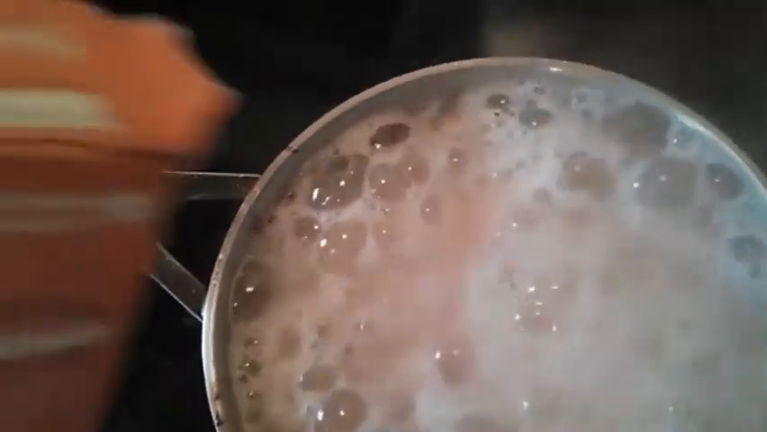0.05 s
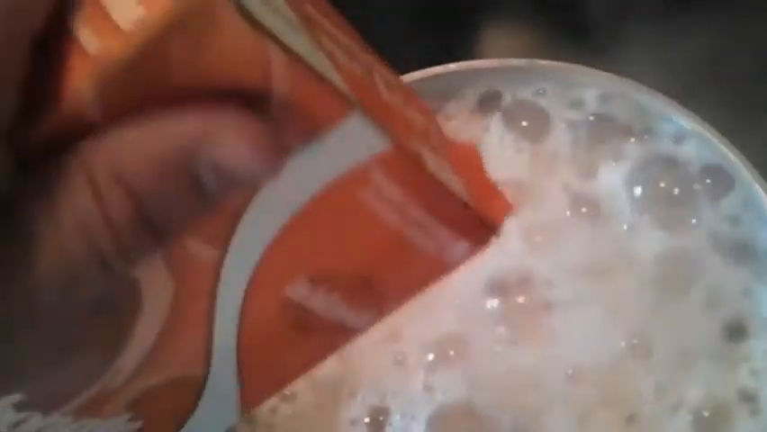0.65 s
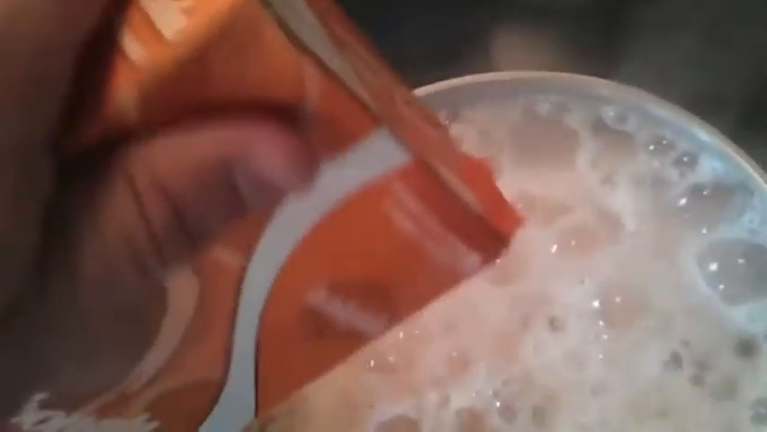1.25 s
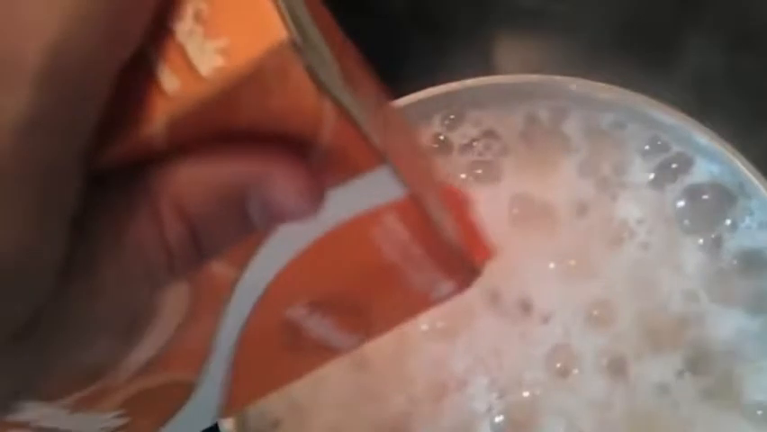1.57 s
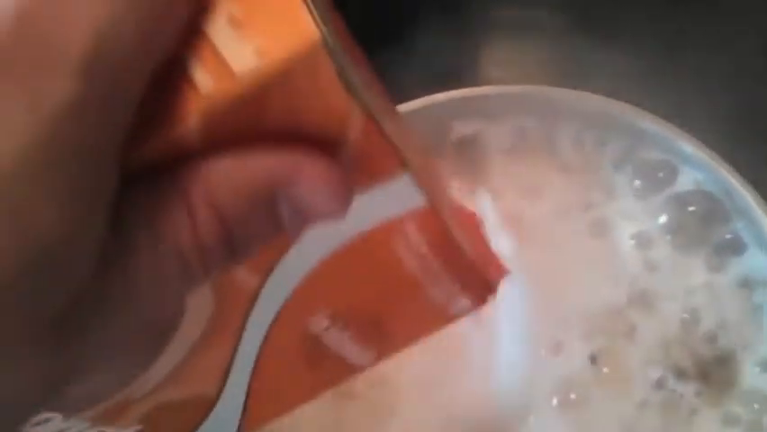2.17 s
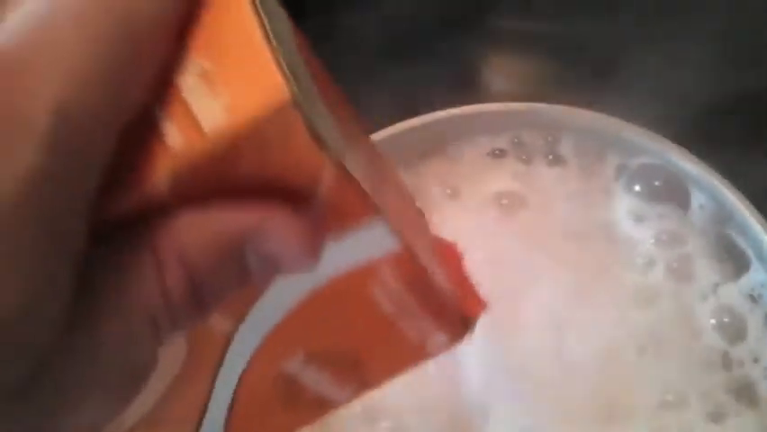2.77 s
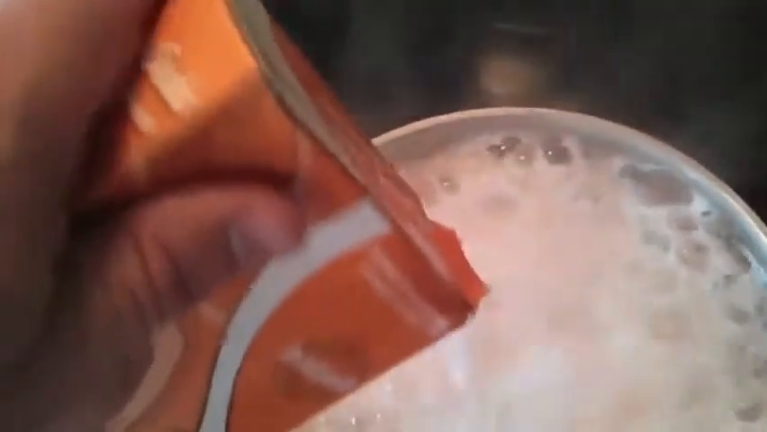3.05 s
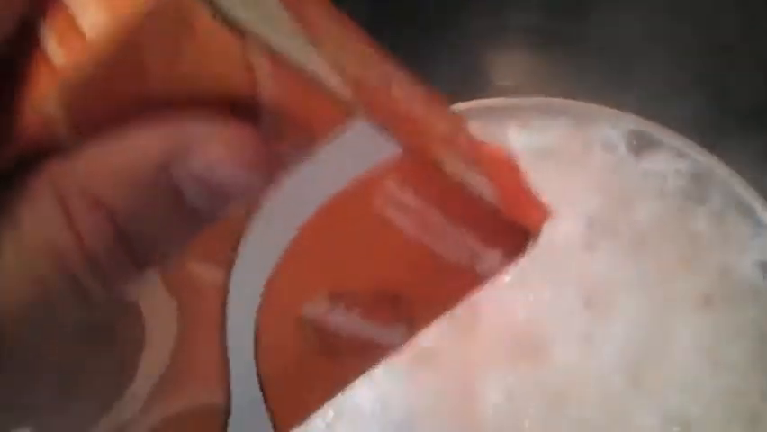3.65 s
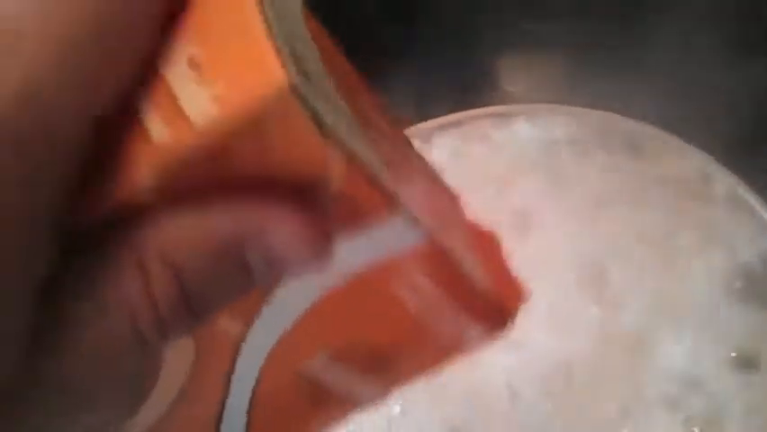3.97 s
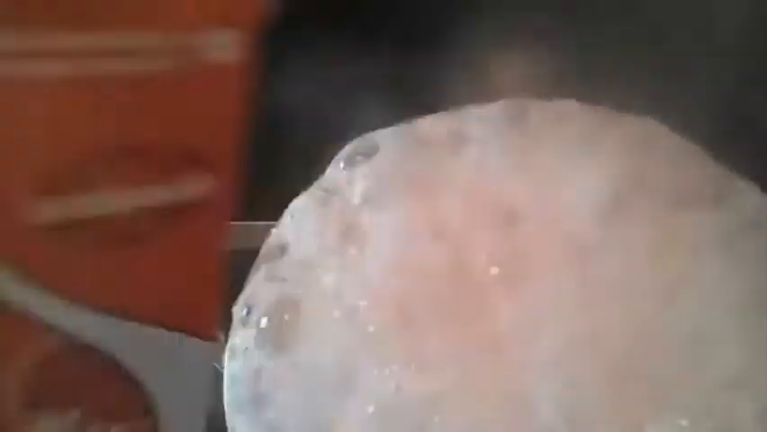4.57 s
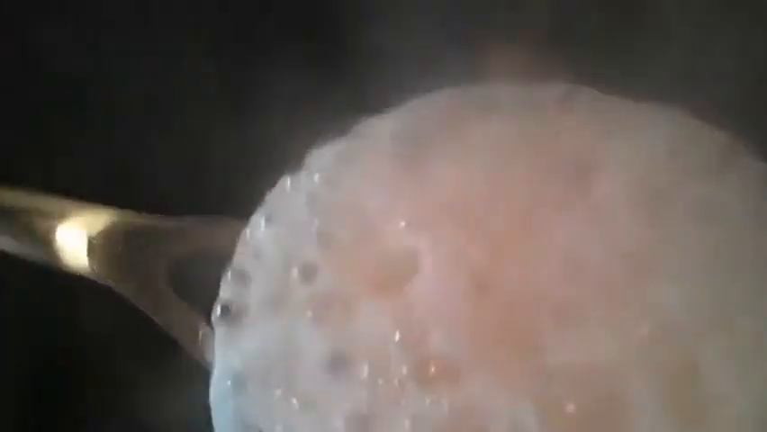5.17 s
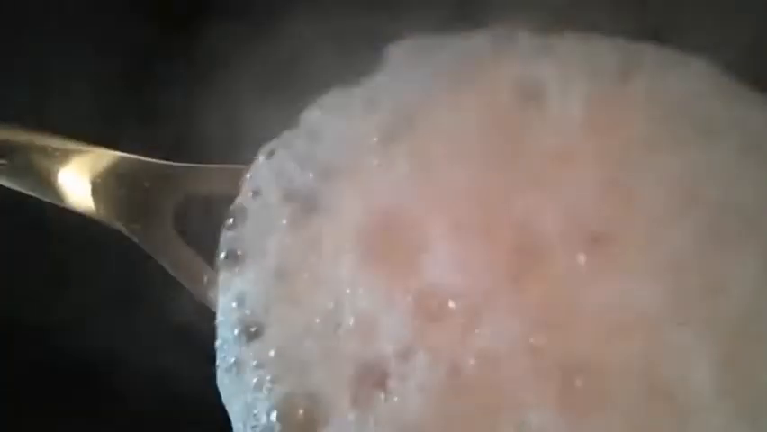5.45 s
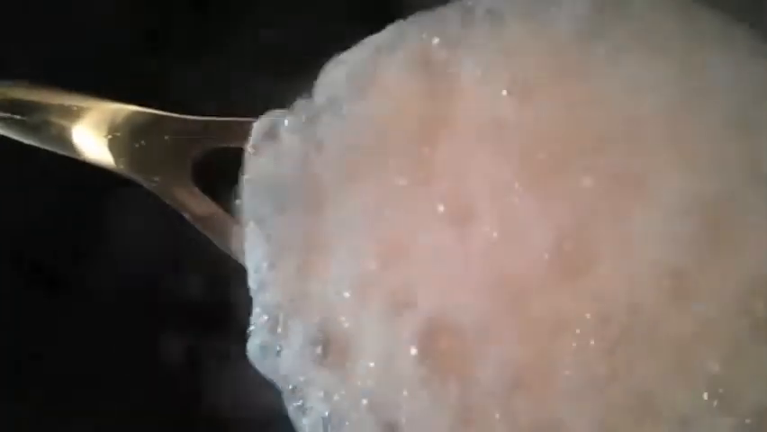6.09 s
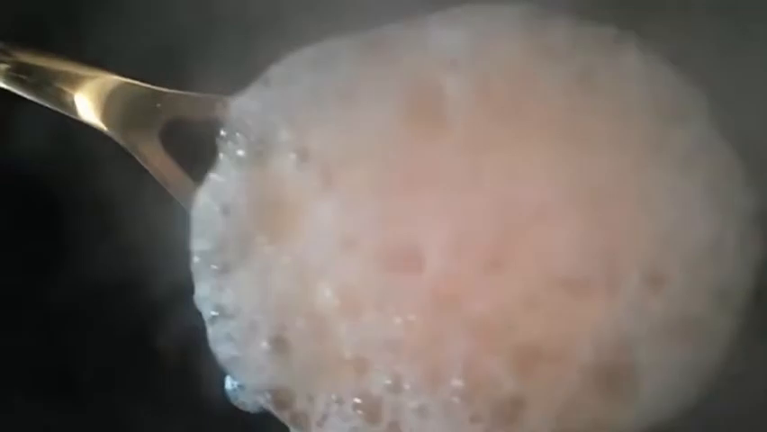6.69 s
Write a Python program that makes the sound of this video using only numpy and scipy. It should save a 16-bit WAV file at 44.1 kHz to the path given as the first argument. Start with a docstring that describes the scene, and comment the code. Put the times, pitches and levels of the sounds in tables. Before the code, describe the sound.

Boiling vinegar in a metal pot fizzes as baking soda pours in, then foams over, hissing and sputtering on the hot burner.

```python
"""Baking soda in boiling vinegar

Vinegar boils in a metal pot on a humming stove, and its bursting bubbles make the pot ring.
Baking soda falls from a box, first in pinches, then in a steady pour. Foam smothers the boil
with a fine fizz of tiny gas bubbles, and the box is set down with a light knock.
Then the foam spills over the rim and hisses and sputters on the hot burner."""
import sys
import numpy as np
from scipy import signal
from scipy.fft import rfft, irfft
from scipy.io import wavfile

SR = 44100
rng = np.random.default_rng(int(sys.argv[2]) if len(sys.argv) > 2 else 0)


def inscribe(sig):
    """Save sig as 16-bit PCM at rate SR to the path in sys.argv[1].

    A 1-D sig is mono; a 2-D sig holds one channel per row.
    Samples are clipped to [-1, 1] before scaling.
    """
    pcm = np.round(np.clip(np.atleast_2d(sig).T, -1, 1) * 32767)
    wavfile.write(sys.argv[1], SR, pcm.astype(np.int16))


N = 305172
TIME = np.arange(N) / SR
BINS = np.fft.rfftfreq(4096, 1 / SR)  # the pitches in Hz at which a tone is shaped

# The stove's drone. Each row: time in seconds, base level in dB.
DRONE_LEVEL = [(0.15, -59.5), (.33, -54.5), (1.25, -57), (2.4, -60), (3.1, -56), (4.0, -57), (5.0, -56),
               (5.35, -64.5), (5.75, -66), (6.8, -61)]
# Knocks and thumps. Each row: start in seconds, relative peak in dB, pitch in Hz, decay in seconds.
KNOCKS = [(0.64, -48, 70, 0.055), (5.075, -30.5, 900, 0.0065), (5.082, -42, 237, .022),
          (5.088, -38.5, 900, 0.014), (5.137, -38, 840, 0.0049), (5.26, -38, 750, 0.015),
          (5.87, -53, 75, 0.11), (6.47, -40, 222, 0.06), (6.551, -42, 300, 0.039)]
# The boil builds, is smothered and stirs again. Each row: time in seconds, level in dB.
BOIL_LEVEL = [(0, -49.5), (1.2, -48), (1.6, -46.5), (2.15, -46), (2.42, -49), (2.58, -47.5), (2.75, -51),
              (3.45, -54.5), (4.55, -58), (5.1, -51), (5.45, -56)]
# The largest bubbles. Each row: start in seconds, relative peak in dB, pitch in Hz.
POPS = [(0.75, -30.5, 1170), (0.901, -32, 654), (0.949, -35, 1590), (1.172, -36, 789), (1.413, -33, 649),
        (1.455, -30.5, 797), (1.625, -33, 630), (1.656, -33, 611), (2.014, -31.5, 816), (2.044, -29, 781),
        (2.144, -28, 643), (2.571, -33, 1200)]
# Fizz from pinches of powder. Each row: start in seconds, peak in dB, rise in seconds.
PINCHES = [(-0.22, -44, 0.58), (0.49, -50, 0.054), (0.82, -50.2, .04), (1.23, -53, .02), (1.42, -59, .05),
           (1.71, -54.8, .03), (1.88, -49, 0.1)]
# Foam reaches the burner, a trickle and then a flood. Each row: time in seconds, dB against full flow.
FLOW = [(5.33, -16.5), (5.42, -8), (5.52, -8.5), (5.6, -6.5), (5.8, -3.5), (6.2, -1.76), (6.5, 0.8),
        (6.7, -.5), (6.9, -0.5)]

# The tone of each sound. Each row: pitch in Hz, relative level in dB.
DRONE_TONE = [(20, -36), (50, -12), (75, -9), (100, -1), (122, -2), (150, -3.5), (190, -9), (310, -11),
              (430, -17), (600, -20), (1200, -24.5)]
BOIL_TONE = [(100, -12.5), (330, -3.5), (430, -13.5), (600, -9), (900, -1.5), (1300, -7.5), (1750, -4),
             (2100, -12.5), (2600, -21.5), (3200, -38), (5000, -19), (9000, -32)]
FRESH_FOAM_TONE = [(2000, -54), (3300, -25), (4500, -12), (5200, -14), (6300, -7.5), (7000, 1.5),
                   (9000, 1.5), (11000, 2.5), (12500, -1)]
OLDER_FOAM_TONE = [(2000, -52), (3200, -27), (4300, -13.5), (5200, -10.5), (6400, -4.5), (7600, -0.5),
                   (8700, -3), (10000, -4), (11000, -9.5), (13000, -7.5)]
LARGE_CELL_TONE = [(700, -18.5), (1200, -8.5), (1600, -5.5), (1980, 0), (2300, -5), (2650, -8),
                   (3000, -15.5), (4000, -34.5)]
STEAM_TONE = [(1800, -26), (3000, -10), (4200, -10), (5000, -2.5), (6000, 2), (8000, -.5), (10000, -0.5),
              (12000, -4), (13500, -5.5)]
SPUTTER_TONE = [(100, -38), (330, -22), (420, -26.5), (650, -18.5), (900, -7), (1350, -5.5), (1700, 0.5),
                (1980, 2), (2350, -3.5), (2700, -6.5), (3300, -12), (4700, -11), (7000, -37.5)]

# How the pot and the gap under it ring. Each row: pitch in Hz, width in Hz, boost or cut in dB.
POT_RESONANCES = [(503.4, 33, 9.5), (621.6, 112, 12), (705, 45, -6), (800, 47, 7), (1100, 60, 3),
                  (1234, 95, 8), (1635, 31, 7)]
GAP_RESONANCES = [(507, 25, 6.5), (642, 26, 4.5), (786, 47, 6), (817, 39, -8.5), (862, 37, 3.5),
                  (1100, 61, 3), (1240, 22, 2.5), (1300, 40, 1.5), (1716, 29, 3), (1880, 30, -3.5),
                  (1930, 32, 2.5), (2085, 18, 1), (2318, 33, 5)]
# The echo between pot and stove top. Each row: pitch in Hz, strength from 0 to 1.
GAP_ECHO = [(500, 0), (1900, 0), (2500, 0.56), (3500, 1), (4200, 0.57), (5200, 0.23), (7000, 0)]

PINCH_FADE_S, PINCH_FRESH_SHARE = 0.19, 0.22
IDLE_FIZZ_DB, SEETHE_DB = -57.5, -17  # old foam between pinches; large cells relative to the fizz
POUR_S, POUR_RISE_S, POUR_DB = 2.01, 0.26, -35.5
FRESH_HOLD_S, COARSEN_S = 0.92, 1.05  # new foam stays very fine for a while, then coarsens
CONTACT_S, CONTACT_RISE_S = 5.3, 0.056  # the foam first touches the burner
HISS_DB, SPUTTER_DB, GURGLE_DB = -23.5, -27.5, -23  # at full flow
SPUTTER_SLOPE, GURGLE_SLOPE = 2.33, 1.71  # dB gained for each dB of flow
SPUTTER_FULL_DB = -5  # the sputter stops growing at this flow
GURGLE_TOP_HZ, TREBLE_LIMIT_HZ = 1670, 14120


def amp(db):
    """Turns decibels into a gain to multiply by."""
    return 10 ** (np.asarray(db) / 20)


def evened(x):
    """Scales a signal to an average (rms) level of 1."""
    return x / np.sqrt(np.mean(x ** 2) + 1e-20)


def since(start):
    """Seconds passed since the start, zero before it."""
    return np.maximum(TIME - start, 0)


def over_time(rows):
    """Joins a table's points into a value for every sample."""
    seconds, value = np.transpose(rows)
    return np.interp(TIME, seconds, value)


def over_pitch(rows):
    """Joins a table's points into a value for every pitch in BINS."""
    hz, value = np.transpose(rows)
    return np.interp(np.log(BINS + 1), np.log(hz), value)


def add(mix, start, sound):
    """Mixes a sound in at a start time in seconds."""
    part = mix[max(round(start * SR), 0):][:len(sound)]
    part += sound[:len(part)]


def resonances(rows):
    """The dB that a hollow space adds to any sound inside it."""
    return sum(db / (1 + (2 * (BINS - hz) / width) ** 2) for hz, width, db in rows)


def bump(hz, octaves):
    """The tone in dB of one broad resonance with steep sides."""
    return -40 * np.log10(1 + (np.log2((BINS + 1) / hz) / octaves) ** 2)


def ring(tone_db):
    """What one click sounds like in this tone (its impulse response)."""
    log_gain = np.log(amp(np.maximum(tone_db, -90)))
    mirrored = np.concatenate([log_gain, log_gain[-2:0:-1]])
    spectrum = np.exp(np.conj(signal.hilbert(mirrored)))  # puts all the ringing after the click
    return np.fft.ifft(spectrum).real


def coloured(x, tone_db):
    """Gives a signal a tone, at an average level of 1."""
    return evened(signal.oaconvolve(x, ring(tone_db))[:N])


def flutter(per_s, depth_db):
    """A gain that wanders at random, up to about per_s times a second."""
    hz = np.fft.rfftfreq(N, 1 / SR)
    slow = rfft(rng.standard_normal(N)) / (1 + (hz / per_s) ** 2)
    return amp(depth_db * evened(irfft(slow, N)))


def patchy(x, width_hz, life_s, depth_db):
    """Bubbles of like size come in swarms, so narrow bands of pitch swell and fade."""
    bands = signal.stft(x, nperseg=1024, noverlap=768)[2]
    across_pitch = np.fft.fftfreq(bands.shape[0], SR / 1024)[:, None]
    along_time = np.fft.fftfreq(bands.shape[1], 256 / SR)
    blur = np.exp(-(across_pitch * width_hz) ** 2 - (along_time * life_s) ** 2)
    swarms = np.fft.ifft2(np.fft.fft2(rng.standard_normal(bands.shape)) * blur).real
    bands *= amp(depth_db * evened(swarms))
    return evened(signal.istft(bands, nperseg=1024, noverlap=768)[1][:N])


def puff(tone_db, decay_s):
    """A brief burst of noise in this tone, with a peak of 1."""
    age = TIME[:SR // 3] / decay_s
    noise = rng.standard_normal(len(age)) * age * np.exp(-2 * age)
    sound = signal.fftconvolve(noise, ring(tone_db))
    return sound / abs(sound).max()


def bursts(per_s, spread_db, wash):
    """Bubbles burst as clicks, a few of them large, over a wash of countless tiny ones."""
    size = amp(spread_db * np.minimum(rng.exponential(1, N), 4))
    clicks = size * rng.choice([-1, 1], N) * (rng.random(N) < per_s / SR)
    return evened(clicks) + wash * rng.standard_normal(N)


def plips(per_s, low_hz, high_hz, cycles, spread_db):
    """Each bursting bubble rings for a few cycles; smaller ones ring higher."""
    when, smallness, force = rng.random((int(per_s * N / SR), 3)).T[:, :, None]
    age = np.arange(SR // 100)  # in samples
    turns = low_hz * (high_hz / low_hz) ** smallness * age / SR
    fade = np.exp(-turns / cycles) * (1 - age / len(age))
    rings = amp(spread_db * force ** 2) * np.sin(2 * np.pi * turns) * fade
    positions = (when * N).astype(int) + age
    return evened(np.bincount(positions.ravel(), rings.ravel(), N)[:N])


def stove():
    """A low, uneven rumble with a wavering mains hum in it."""
    rumble = coloured(rng.standard_normal(N), over_pitch(DRONE_TONE))
    hum = np.sin(2 * np.pi * 119.5 * TIME) * flutter(per_s=3.7, depth_db=4.5)
    level = amp(over_time(DRONE_LEVEL)) * flutter(per_s=5.7, depth_db=1.9)
    return level * (amp(2.0) * rumble + amp(-4.5) * hum)


def knocks():
    """Dull blows, each a short shudder in one broad resonance."""
    out = np.zeros(N)
    for start, db, hz, decay_s in KNOCKS:
        add(out, start, amp(db + 0.5) * puff(bump(hz, octaves=0.97), decay_s))
    return out


def boil():
    """Vapour bubbles burst in clusters and ring the pot; the largest stand out as pops."""
    pot_db = over_pitch(BOIL_TONE) + resonances(POT_RESONANCES)
    crackle = bursts(per_s=1100, spread_db=3.0, wash=0.58)
    pitched = plips(per_s=500, low_hz=468, high_hz=2150, cycles=6.6, spread_db=11)
    bubbles = coloured(crackle + 0.22 * pitched, pot_db) * flutter(per_s=30, depth_db=1.37)
    out = bubbles * amp(over_time(BOIL_LEVEL))
    for start, db, hz in POPS:
        add(out, start, amp(db - 0.7) * puff(pot_db + bump(hz, octaves=2.2), decay_s=0.0014))
    return out


def reaction():
    """Soda meets vinegar: gives the strength of the fizz and its share of fresh, very fine bubbles."""
    pinch_power = np.zeros(N)
    for start, db, rise_s in PINCHES:
        rise = np.minimum(since(start) / rise_s, 1)
        fade = np.exp(-since(start + rise_s) / PINCH_FADE_S)
        pinch_power += (amp(db) * rise * fade) ** 2
    pour_power = amp(POUR_DB) ** 2 * (1 - np.exp(-since(POUR_S) / POUR_RISE_S))
    power = amp(IDLE_FIZZ_DB) ** 2 + pinch_power + pour_power
    pour_freshness = np.exp(-since(POUR_S + FRESH_HOLD_S) / COARSEN_S)
    fresh_share = (PINCH_FRESH_SHARE * pinch_power + pour_freshness * pour_power) / power
    return np.sqrt(power), np.clip(fresh_share, 0, 1)


def foam():
    """Gas fizzes out of tiny foam cells, finest when fresh; larger cells seethe at a lower pitch."""
    strength, fresh_share = reaction()
    tiny = bursts(per_s=9000, spread_db=2.5, wash=1.0)
    fresh = coloured(tiny, over_pitch(FRESH_FOAM_TONE))
    older = coloured(tiny[::-1], over_pitch(OLDER_FOAM_TONE))
    blend = np.sqrt(fresh_share) * fresh + np.sqrt(1 - fresh_share) * older
    fizz = patchy(blend, width_hz=56, life_s=0.16, depth_db=2.5)
    cell_db = over_pitch(LARGE_CELL_TONE) + 0.22 * resonances(POT_RESONANCES)
    cells = coloured(bursts(per_s=3700, spread_db=1.0, wash=0.98), cell_db)
    seethe = patchy(cells, width_hz=76, life_s=0.2, depth_db=3.5) * flutter(per_s=4.2, depth_db=0.9)
    return strength * (fizz * flutter(per_s=18, depth_db=0.25) + seethe * amp(SEETHE_DB))


def gap_echo(x):
    """Sound leaves the gap under the pot twice, 3 ms apart, which makes its tone hollow."""
    share = np.clip(over_pitch(GAP_ECHO), 0, 0.9)
    echo = np.exp(-2j * np.pi * BINS * 0.003)
    hollow = abs(1 + share * echo) / np.sqrt(1 + share ** 2)
    return signal.oaconvolve(x, ring(20 * np.log10(hollow)))[:N]


def spill():
    """Foam hits the hot burner: steam hisses, drops sputter, and the sound deepens as the puddle grows."""
    contact = np.minimum(since(CONTACT_S) / CONTACT_RISE_S, 1)
    flow_db = over_time(FLOW)
    steam = coloured(bursts(per_s=6000, spread_db=2.0, wash=1.0), over_pitch(STEAM_TONE))
    hiss = patchy(steam, width_hz=49, life_s=0.17, depth_db=3.5) * flutter(per_s=14, depth_db=0.66)
    drop_db = over_pitch(SPUTTER_TONE) + resonances(GAP_RESONANCES)
    drops = coloured(bursts(per_s=4500, spread_db=2.0, wash=0.89), drop_db)
    sputter = patchy(drops, width_hz=35, life_s=0.12, depth_db=2.5) * flutter(per_s=16, depth_db=0.53)
    # the gurgle is the low part of the sputter
    gurgle = signal.sosfiltfilt(signal.butter(3, GURGLE_TOP_HZ, fs=SR, output="sos"), sputter)
    sputter_db = SPUTTER_DB + SPUTTER_SLOPE * np.minimum(flow_db - SPUTTER_FULL_DB, 0)
    out = hiss * amp(HISS_DB + flow_db)
    out += (sputter - gurgle) * amp(sputter_db)
    out += gurgle * amp(GURGLE_DB + GURGLE_SLOPE * flow_db)
    return gap_echo(contact * out)


def scene():
    """Adds up all the sounds, the same in both channels."""
    mono = boil() + foam() + spill() + stove() + knocks()
    return np.array([mono, mono])


def record(dry):
    """Cuts off the very highest treble."""
    low_pass = signal.firwin(701, TREBLE_LIMIT_HZ, window=("kaiser", 8), fs=SR)
    return signal.oaconvolve(dry, low_pass[None], "same")


dry = scene()
out = record(dry)
inscribe(out)
```